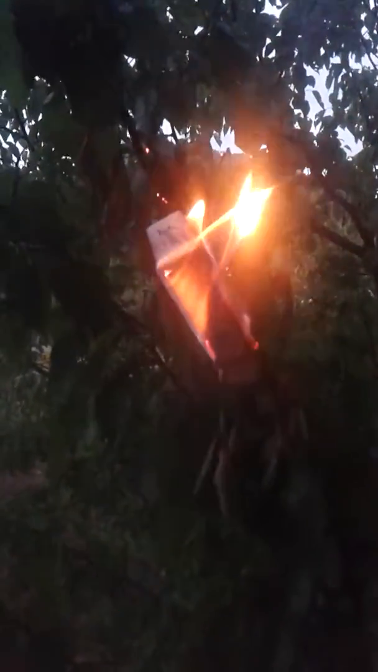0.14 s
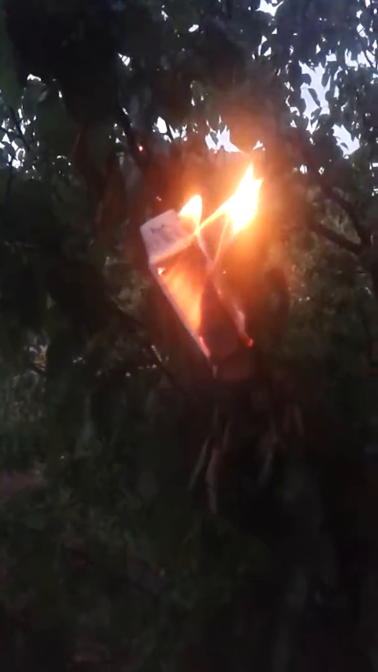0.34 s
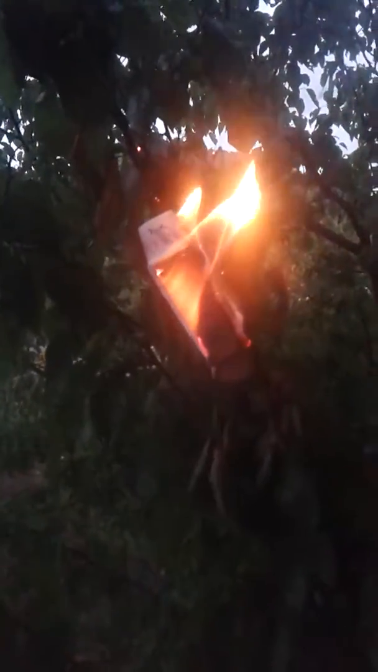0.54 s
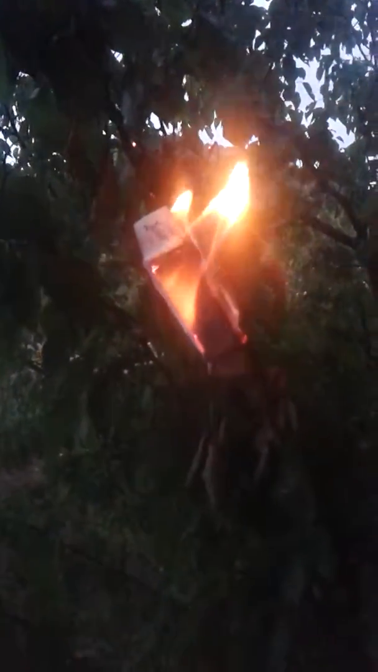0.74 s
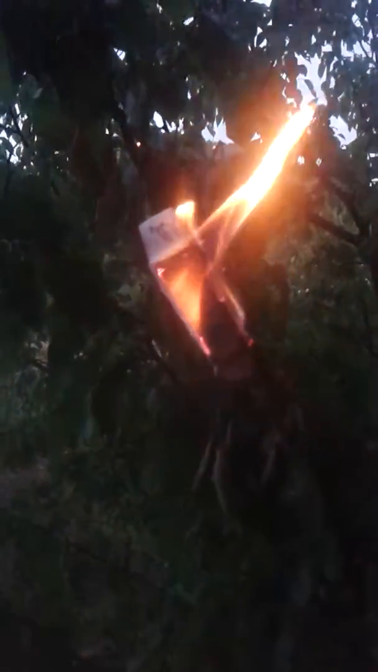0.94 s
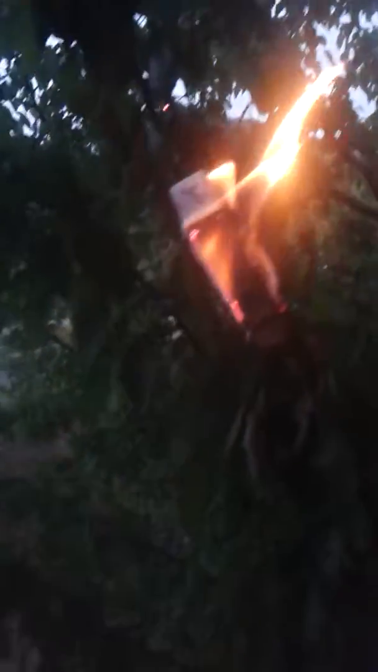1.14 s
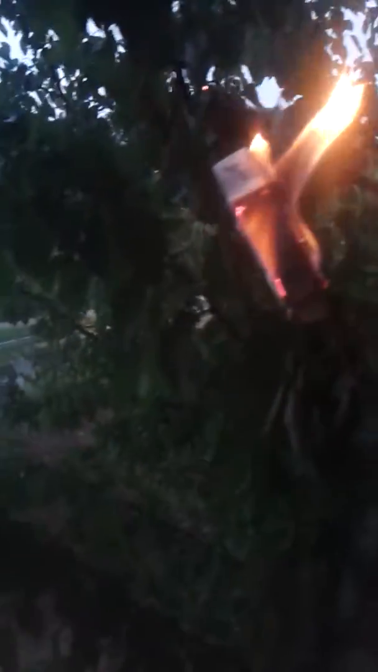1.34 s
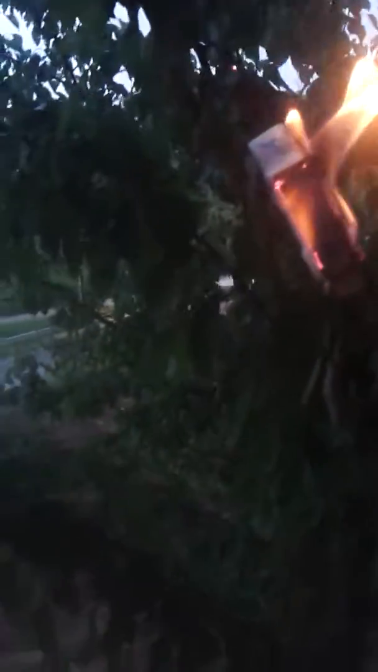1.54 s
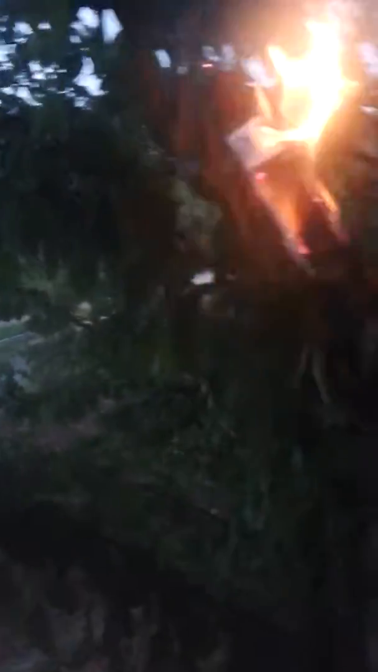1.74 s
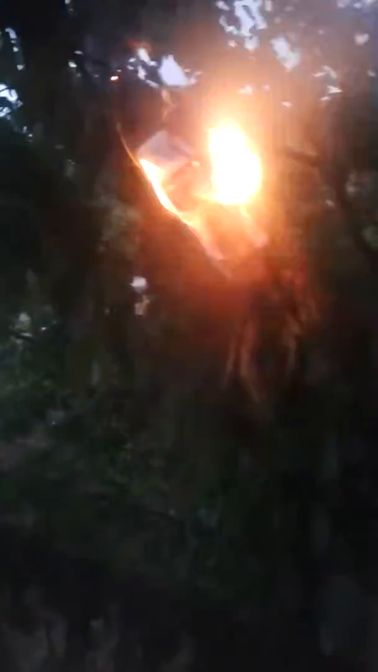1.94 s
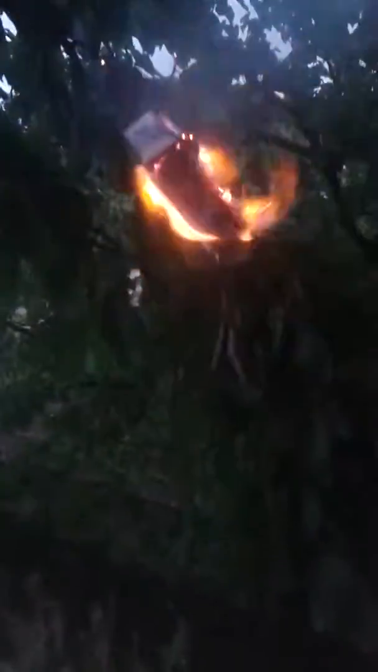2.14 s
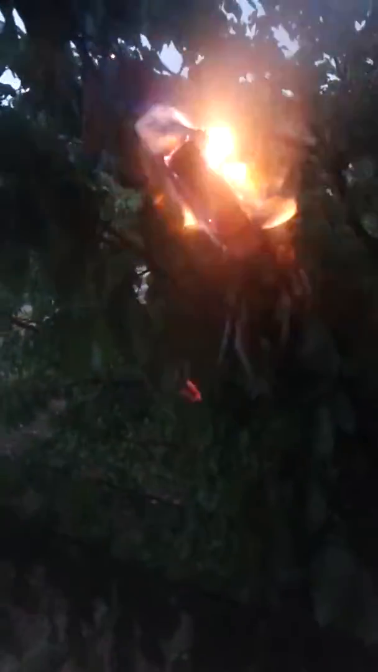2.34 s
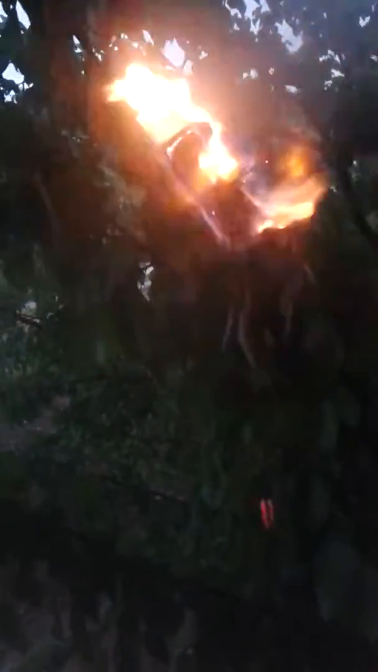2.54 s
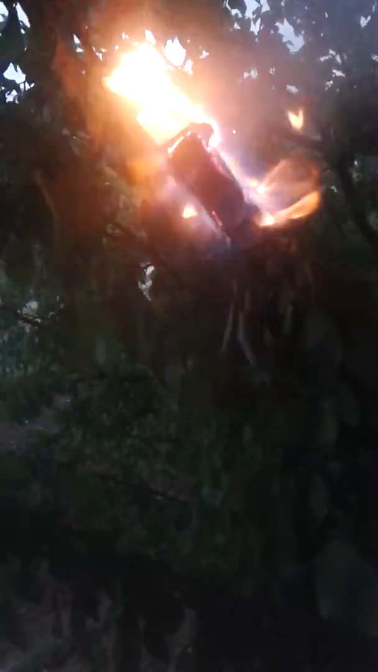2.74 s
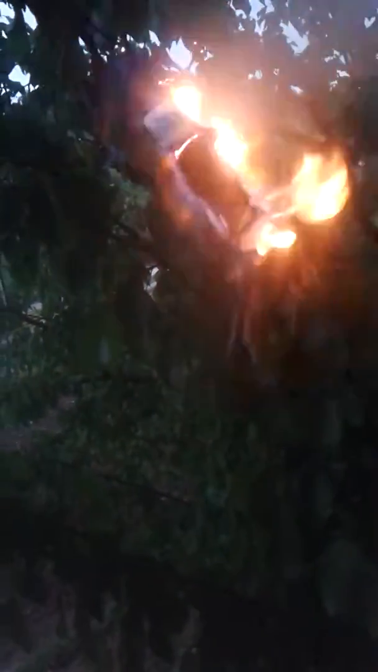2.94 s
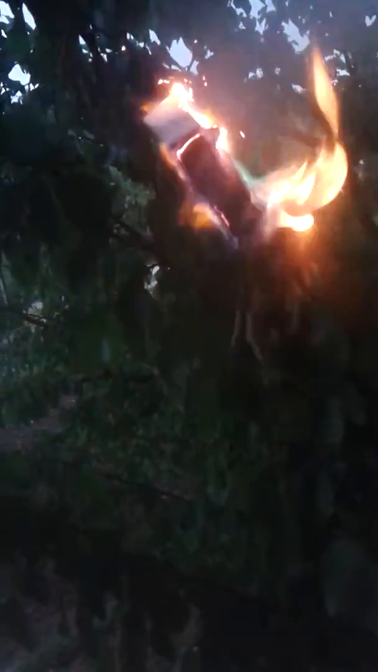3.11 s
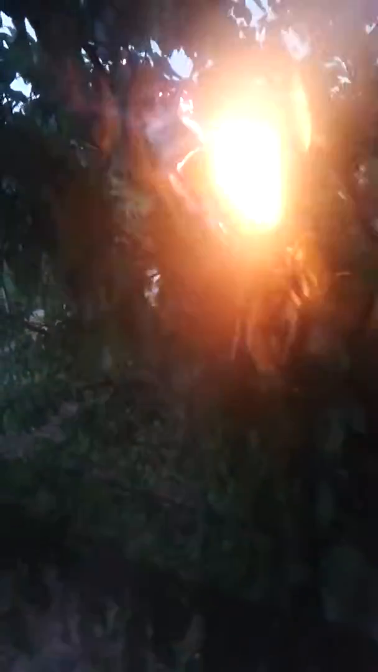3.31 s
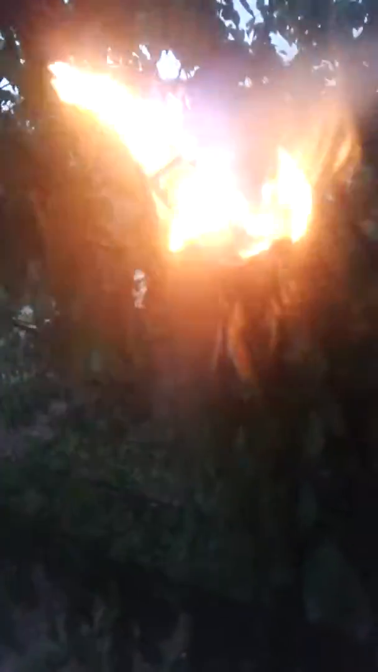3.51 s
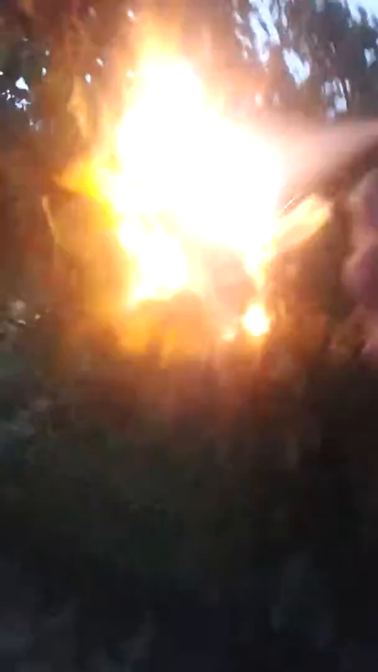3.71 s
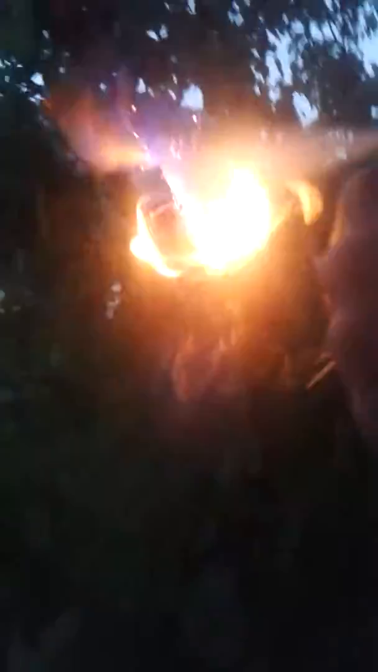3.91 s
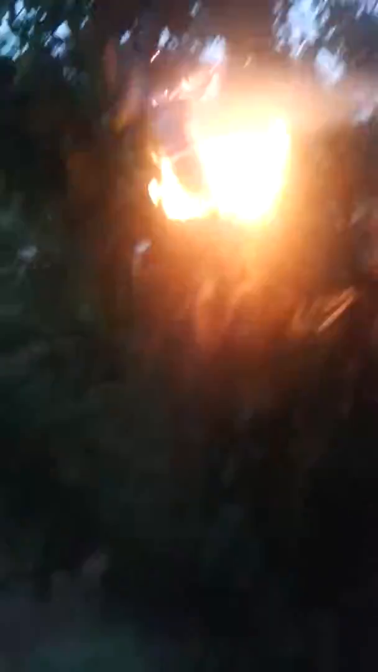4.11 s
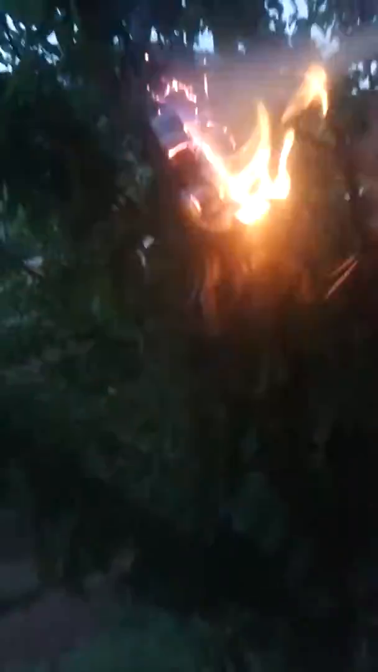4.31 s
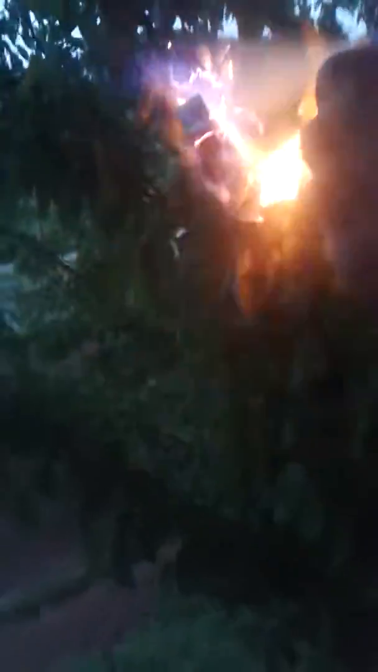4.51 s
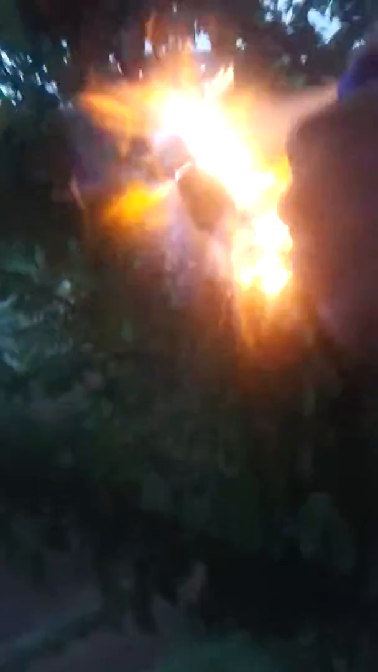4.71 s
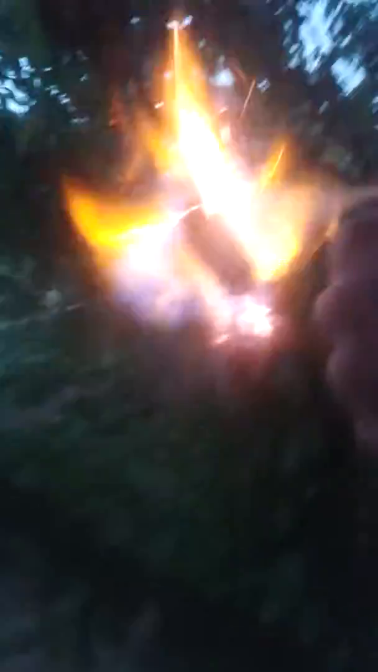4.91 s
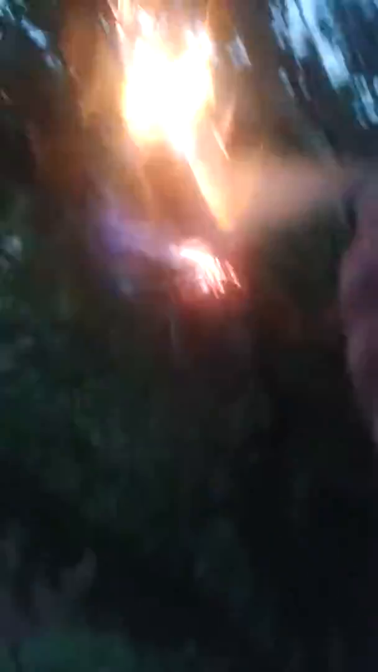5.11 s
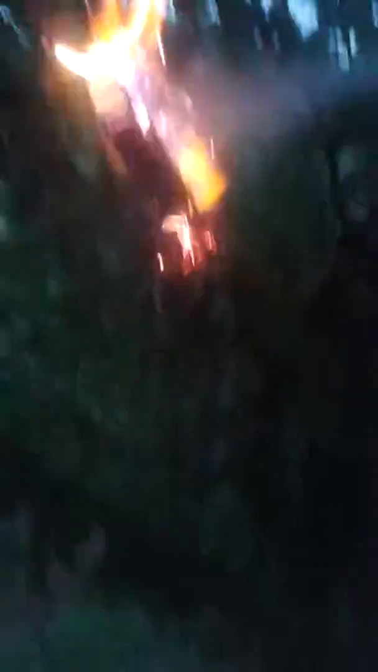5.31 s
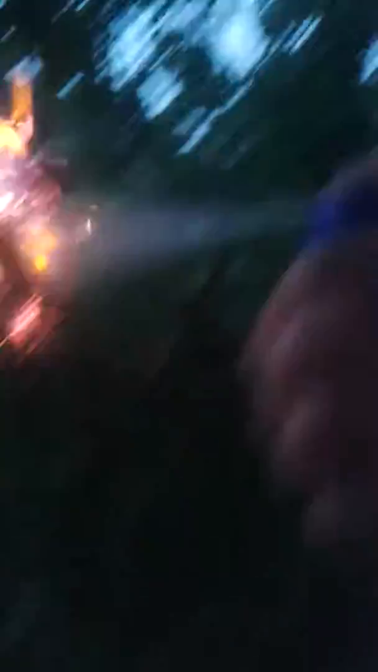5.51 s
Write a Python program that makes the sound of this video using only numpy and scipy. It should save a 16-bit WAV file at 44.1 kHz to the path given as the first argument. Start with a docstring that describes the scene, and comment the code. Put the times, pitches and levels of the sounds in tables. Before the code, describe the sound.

A steady spray-can hiss feeds a burning paper in a tree; puffs build to two deep whooshing flare-ups, then frying and snaps.

```python
"""A soft outdoor wash with faint ticks and snaps: paper smoulders in a tree on a quiet evening.
An aerosol can is sprayed at it: kicks of random size, coloured to a hiss for a far and a near can.
Its mist catches in fluttering puffs, then twice swells into a roaring fireball: a low roar of sparser
kicks under a rush of denser ones. The can is brought closer on the way, and the scorched paper fries
and snaps, as decaying sines, while the second blaze dies."""
import sys
import numpy as np
from scipy import signal
from scipy.fft import rfft, irfft
from scipy.io import wavfile

SR = 44100
rng = np.random.default_rng(int(sys.argv[2]) if len(sys.argv) > 2 else 0)


def log_audio(samples):
    """Write samples as a 16-bit WAV file to the path given in sys.argv[1]."""
    # one column per channel
    frames = np.atleast_2d(samples).T
    # limit to full scale, then quantise
    limited = np.clip(frames, -1, 1)
    pcm = np.round(limited * 32767).astype(np.int16)
    wavfile.write(sys.argv[1], SR, pcm)


N = 244755
TIME = np.arange(N) / SR

# Closeness of the can. Each row: time in seconds, reach from 0 (far off) to 1 (close to the fire).
CAN_REACH = [(1.5, 0.0081), (3.2, 0.018), (3.55, 0.61), (4.2, 0.95), (5.55, 1)]


def from_db(db):
    """Amplitude ratio of a level in dB."""
    return 10 ** (np.asarray(db) / 20)


def unit(x):
    """Scales to rms 1."""
    return x / np.sqrt(np.mean(x ** 2) + 1e-20)


def follow(table, column=1):
    """One column of a curve, interpolated to every sample."""
    rows = np.array(table)
    return np.interp(TIME, rows[:, 0], rows[:, column])


def add(mix, start_s, sound):
    """Mixes a sound in at a given time."""
    part = mix[max(round(start_s * SR), 0):][:len(sound)]
    part += sound[:len(part)]


def wander(per_s):
    """Smooth random curve of rms 1: noise low-passed at about per_s Hz."""
    hz = np.fft.rfftfreq(N, 1 / SR)
    spectrum = rfft(rng.standard_normal(N)) / (1 + (hz / per_s) ** 4)
    return unit(irfft(spectrum, N))


def bursts(per_s, spread_db):
    """Random train of one-sample pressure kicks of rms 1, mostly small and a few large."""
    size = from_db(spread_db * np.minimum(rng.exponential(1, N), 4))
    sign = rng.choice([-1., 1.], N)
    return unit(size * sign * (rng.random(N) < per_s / SR))


def colour(x, points, band_hz):
    """Minimum-phase filter through points (Hz, dB), scaled to a mean power gain of 1 inside the band."""
    size = 4096
    hz = abs(np.fft.fftfreq(size, 1 / SR))
    point_hz, point_db = np.transpose(points)
    gain = from_db(np.interp(np.log(hz + 1), np.log(point_hz), point_db))
    in_band = (hz > band_hz[0]) & (hz < band_hz[1])
    gain /= np.sqrt(np.mean(gain ** 2 * in_band) )
    # the Hilbert transform of the log gain gives the minimum phase
    taps = np.fft.ifft(np.exp(np.conj(signal.hilbert(np.log(gain))))).real
    return signal.oaconvolve(x, taps[:size // 2])[:N]


def reflect(x, delay_s, share, dull_hz):
    """Adds one close reflection, which combs the spectrum mainly below dull_hz."""
    low_pass = signal.butter(1, min(dull_hz, .45 * SR), fs=SR, output="sos")
    soft = signal.sosfiltfilt(low_pass, x)
    echo = np.interp(TIME - delay_s, TIME, soft, left=0)
    return (x + share * echo) / np.sqrt(1 + share ** 2)


def swell(full_s, hold_s, db, attack_s, release_s):
    """Gain that rises to full at full_s, holds and falls away, ever more steeply in dB."""
    flank_db, flank_curve = 9.5, 1.47  # one attack or release time away from the top is flank_db down
    before = np.maximum((full_s - TIME) / attack_s, 0)
    after = np.maximum((TIME - full_s - hold_s) / release_s, 0)
    return from_db(db - flank_db * (before + after) ** flank_curve)


def flame():
    """Turbulent burning: kicks of heat release give a low roar, and finer eddies a rush above it."""
    roar_band_hz, rush_band_hz = (40, 600), (700, 1700)
    # Spectra. Each row: frequency in Hz, density in dB before scaling to the band.
    roar_points = [(20, -30), (40, -13), (70, -4.5), (110, 0.5), (195, 2.5), (290, -6.5), (420, -16),
                   (560, -16.5), (850, -24.5), (1400, -33.5), (2200, -37), (6000, -67)]
    rush_points = [(150, -22), (330, 0.5), (600, 2), (830, -1.5), (1500, -5), (1850, -12), (3150, -9.5),
                   (4300, -18), (6000, -21), (8000, -29.5), (14500, -39)]
    # Low middle thinning out. Each row: time in seconds, gain of that band in dB.
    low_middle_gain = [(2.4, 4), (3.8, 1.8), (4.6, -1.5)]
    low_middle_hz = (248, 453)
    hollow_hz, hollow_width_hz = 232, 56.4

    roaring, rushing = blaze()
    flutter = wander(per_s=51.8)
    heat = roaring * from_db(2.3 * flutter) * bursts(per_s=2500, spread_db=3.0)
    gusts = from_db(-2.5 + 2.0 * flutter + 1.0 * wander(per_s=170))
    eddies = gusts * bursts(per_s=9000, spread_db=2.5)
    flares = puffs()
    # a small flame puffs more brightly than a large one
    level_db = 20 * np.log10(roaring + 1e-9)
    flare_rush = from_db(-14.5 - 0.294 * (level_db + 47.5)) * flares

    roar = colour(heat + flares, roar_points, roar_band_hz)
    rush = colour(rushing * eddies + flare_rush, rush_points, rush_band_hz)
    burn = roar + foliage(rush, wet_db=-8.0, last_s=.03)
    # the reflected path shortens on approach
    burn = reflect(burn, delay_s=.0023 - 0.000232 * follow(CAN_REACH), share=0.36, dull_hz=1630)
    low_middle_pass = signal.butter(2, low_middle_hz, "band", fs=SR, output="sos")
    low_middle = signal.sosfiltfilt(low_middle_pass, burn)
    burn = burn + (from_db(follow(low_middle_gain)) - 1) * low_middle + throat(eddies)
    hollow = signal.iirnotch(hollow_hz, hollow_hz / hollow_width_hz, fs=SR)
    return signal.lfilter(*hollow, burn)


def blaze():
    """Strength of the roar and of the rush: the steady flame and its surges add in power."""
    # Surges of the flame. Each row: full at seconds, hold in seconds, roar level in dB,
    # attack in seconds, release in seconds, upper rush relative to the roar in dB.
    surge_rows = [(2.428, .14, -48, 0.091, .05, -7.5), (2.756, 0.28, -42.5, 0.075, .22, -11),
                  (3.413, 0.24, -35, 0.052, .1, -11), (3.713, 0.1292, -18.5, 0.11, .11, -17),
                  (4.18, 0.0635, -40, 0.245, 0.046, -13), (4.772, 0.13, -23, 0.23, 0.2812, -14.5),
                  (5.385, 0.125, -34.5, 0.12, .1, -12.5)]
    # the mist catches and feeds a small, steady flame
    steady = swell(full_s=2.14, hold_s=N / SR, db=-49.5, attack_s=0.2, release_s=0.2)
    roar_power = steady ** 2
    rush_power = (steady * from_db(-7)) ** 2
    for full_s, hold_s, db, attack_s, release_s, rush_db in surge_rows:
        surge = swell(full_s, hold_s, db, attack_s, release_s)
        roar_power = roar_power + surge ** 2
        rush_power = rush_power + (surge * from_db(rush_db)) ** 2
    return np.sqrt(roar_power), np.sqrt(rush_power)


def puffs():
    """Pockets of mist catch at once: noise under a quick rise and slower decay, not yet coloured."""
    # Each row: start in seconds, level in dB before the common trim and colouring,
    # time scale in seconds (the peak comes after a third of it).
    puff_rows = [(1.974, -42, .035), (2.075, -35.5, 0.031), (2.273, -41.5, 0.016), (2.422, -34.5, 0.026),
                 (2.456, -35, 0.016), (2.538, -27, 0.016), (2.561, -29, 0.021), (2.703, -30, 0.016),
                 (2.735, -28.5, 0.0129), (2.791, -25, 0.0177), (2.921, -27, 0.0324), (3.09, -32, 0.011),
                 (3.216, -30, 0.0315), (3.368, -27.5, 0.02), (3.623, -14.5, 0.031), (3.703, -17.5, 0.033),
                 (3.772, -12, 0.0089), (3.841, -15.5, 0.014), (3.967, -18, 0.025), (4.184, -34, 0.019),
                 (4.243, -29, 0.017), (4.589, -23, 0.014), (4.787, -12, 0.012), (4.87, -16, 0.017),
                 (5.032, -14, 0.011), (5.126, -23.5, 0.015)]
    trim_db = -4.0
    flares = np.zeros(N)
    for start_s, db, scale_s in puff_rows:
        u = np.arange(int(3 * scale_s * SR)) / (scale_s * SR)
        envelope = 3 * u * np.exp(1 - 3 * u)
        add(flares, start_s, from_db(db + trim_db) * envelope * rng.standard_normal(N)[:len(u)])
    return flares


def throat(eddies):
    """A broad resonance in the first fireball, stirred by the eddies of the flame."""
    centre_hz, width_hz = 804, 180
    edges_hz = [centre_hz - width_hz / 2, centre_hz + width_hz / 2]
    note = signal.sosfilt(signal.butter(2, edges_hz, "band", fs=SR, output="sos"), eddies)
    return swell(full_s=3.7, hold_s=.11, db=-38.5, attack_s=.085, release_s=.1) * unit(note)


def jet():
    """Gas and droplets tear out of the nozzle; the hiss changes colour as the can comes closer."""
    hiss_band_hz = (5000, 9000)
    open_s, opening_s = 1.626, 0.029  # valve fully open at, time constant of opening
    # Open jet. Each row: time in seconds, hiss level in dB, treble relative to the hiss in dB;
    # flutter and small offsets are added to both levels.
    spray = [(1.65, -52.5, 1.5), (1.71, -51.5, -2.5), (2.18, -48.5, 1), (2.74, -49.5, 1.5),
             (3.05, -48.5, 0), (3.47, -50, 4.5), (3.64, -49.5, -0.5), (4.55, -52, 0), (4.79, -50.5, 0.5),
             (5.28, -49.5, 3), (5.34, -47.5, 4), (5.39, -48, -5), (5.43, -50, -7), (5.55, -46.5, -3.5)]
    # Spectra of the far and the near can. Each row: frequency in Hz, density in dB before scaling.
    far_points = [(60, -14.5), (170, -11.5), (270, -2.5), (450, -4), (1000, -5), (2200, -6.5), (4000, -2),
                  (4800, -2.5), (5900, 1.5), (7000, -4), (8800, -7), (10300, -4), (11300, -8.5),
                  (13300, -3.5), (14500, -8)]
    near_points = [(60, -27), (400, 3), (1000, 1), (2200, -2.5), (3400, 0.5), (4700, -2), (6600, 1.5),
                   (7900, -4), (9200, -4.5), (10400, -1), (11400, -1.5), (13500, 2), (14500, -1)]

    # a little gas escapes first, under the rising pressure of the finger
    leak = swell(open_s, hold_s=0, db=-13, attack_s=0.145, release_s=opening_s)
    valve = np.hypot(np.exp(np.minimum(TIME - open_s, 0) / opening_s), leak)
    flow = valve * from_db(follow(spray) + 0.87 * wander(per_s=91))

    # far and near crossfade at equal power
    reach = np.clip(follow(CAN_REACH), 0, 1)
    far_flow = from_db(1.0241) * np.sqrt(1 - reach) * flow
    near_flow = from_db(-0.31) * np.sqrt(reach) * flow
    far = colour(far_flow * bursts(per_s=22000, spread_db=2.5), far_points, hiss_band_hz)
    near = colour(near_flow * bursts(per_s=22000, spread_db=2.5), near_points, hiss_band_hz)
    far = reflect(far, delay_s=0.0015, share=0.14, dull_hz=18000)
    near_delay_s = 0.001083 * (1 + 0.098 * wander(per_s=1.39))
    near = reflect(near, near_delay_s, share=0.238, dull_hz=18000)
    hiss = foliage(far + near, wet_db=-9, last_s=.014)

    # the finest sizzle is beamed, so it comes and goes with the aim of the nozzle
    sizzle = signal.sosfiltfilt(signal.butter(4, 9300, "high", fs=SR, output="sos"), hiss)
    sizzle_db = follow(spray, column=2) + 0.11 - 1.33 * reach + .5 * wander(per_s=74)
    return hiss + sizzle * (from_db(sizzle_db) - 1)


def frying():
    """Wet, scorched fibres crackle too densely to be told apart."""
    # Spells of frying. Each row: full at seconds, hold in seconds, level in dB before colouring,
    # attack in seconds, release in seconds.
    spells = [(4.82, 0.21, -46.5, 0.25, 0.18), (5.47, .02, -55, 0.15, .06)]
    points = [(500, -17), (2200, -6.5), (3800, 5.5), (5500, 6), (6800, -9.0), (8200, -22), (14500, -32)]
    strength = sum(swell(*spell) for spell in spells)
    return colour(strength * bursts(per_s=7000, spread_db=3.0), points, band_hz=(2500, 7000))


def snaps():
    """Fibres of the paper burst, each ringing briefly as a decaying sine."""
    # Each row: start in seconds, level in dB before the common gain, pitch in Hz,
    # time to ring down by 60 dB in seconds.
    snap_rows = [(.399, -55, 3000, 0.013), (.496, -47, 1060, .008), (0.68, -47, 1530, 0.0044),
                 (.905, -65.5, 3000, .09), (.958, -46, 4000, .002), (1.108, -57, 10500, .004),
                 (1.125, -46, 420, 0.0107), (1.198, -52, 448, 0.0456), (1.425, -56, 485, 0.041),
                 (1.456, -45, 1400, 0.0061), (5.123, -18.5, 3400, 0.00162), (5.1897, -11, 2050, 0.0017),
                 (5.3079, -20, 3960, 0.0025), (5.315, -26, 3900, 0.0025), (5.434, -24, 4720, 0.0018),
                 (5.47, -20.5, 4530, 0.002), (5.4876, -12.5, 1210, 0.00124)]
    gain_db = 5.0
    out, t = np.zeros(N), np.arange(SR // 10) / SR
    for start_s, db, hz, t60_s in snap_rows:
        decay = from_db(db + gain_db - 60 * t / t60_s)
        onset = 1 - np.exp(-3 * hz * t)
        add(out, start_s, decay * onset * np.sin(2 * np.pi * hz * t))
    return out


def smoulder():
    """Soft outdoor wash of coloured noise, with the faint ticking of glowing paper."""
    air_band_hz = (200, 8000)
    # Wash spectrum. Each row: frequency in Hz, density in dB before scaling to the band.
    air_points = [(15, -61), (25, -23.5), (74, -7.5), (105, -4.5), (253, -10.5), (455, -7), (594, -10.5),
                  (679, -4.5), (775, -9), (1130, -7), (2130, -12.5), (2940, -14.5), (3930, -15.5),
                  (14500, -28)]
    tick_points = [(200, -17), (1200, 1.5), (3500, -4), (7000, -7.5), (14000, -12.5)]
    # a light draught swells the wash once
    draught = swell(full_s=0.6, hold_s=1.08, db=-68.5, attack_s=1, release_s=.1)
    strength = np.hypot(from_db(-69), draught) * from_db(3.0 + .5 * wander(per_s=11))
    wash = colour(rng.standard_normal(N), air_points, air_band_hz) * strength
    ticks = colour(bursts(per_s=39, spread_db=4), tick_points, air_band_hz)
    return wash + from_db(-85) * ticks


def foliage(x, wet_db, last_s, count=40):
    """Leaves and branches scatter a few weak, early echoes."""
    delay_s = rng.uniform(.002, last_s, count)
    taps = np.zeros(SR // 4)
    taps[(delay_s * SR).astype(int)] = rng.choice([-1., 1.], count) * np.exp(-2 * delay_s / last_s)
    echoes = signal.oaconvolve(x, taps / np.linalg.norm(taps))[:N]
    wet = from_db(wet_db)
    return (x + wet * echoes) / np.sqrt(1 + wet ** 2)


def scene():
    """Sum of all sources, as one channel."""
    snapping = foliage(snaps(), wet_db=-9, last_s=.025)
    return (flame() + jet() + frying() + snapping + smoulder())[None]


def record(dry):
    """The recorder's band limit: a linear-phase low-pass."""
    cutoff_hz = 14650
    taps = signal.firwin(601, cutoff_hz, window=("kaiser", 9), fs=SR)
    return signal.oaconvolve(dry, taps[None], "same")


dry = scene()
out = record(dry)
log_audio(out)
```